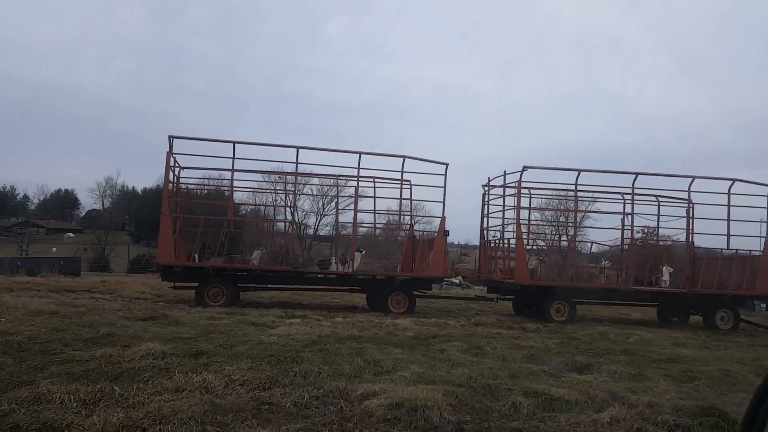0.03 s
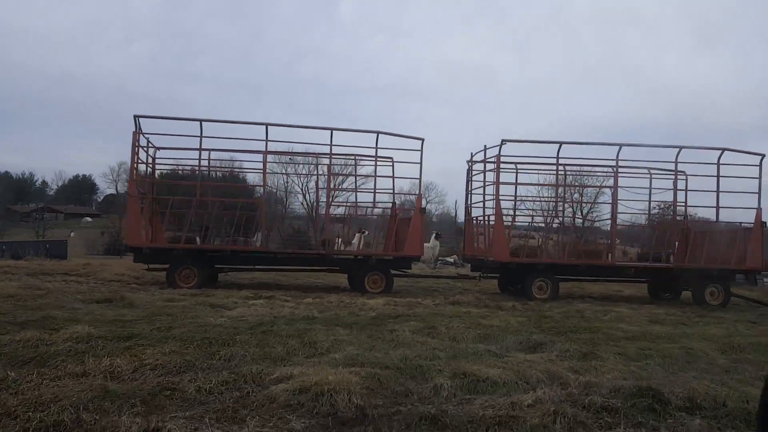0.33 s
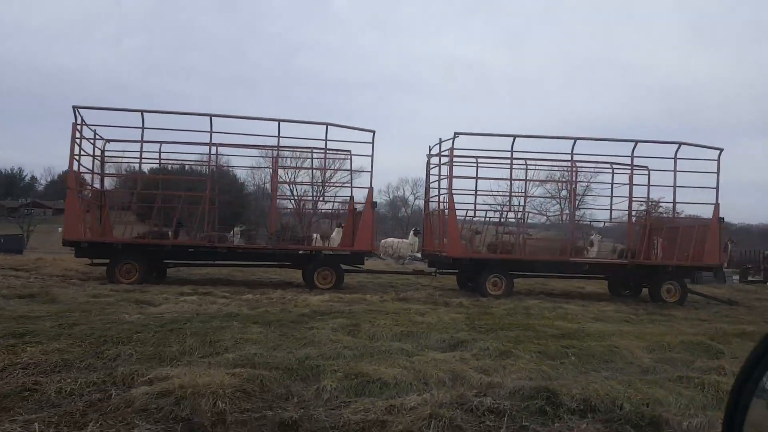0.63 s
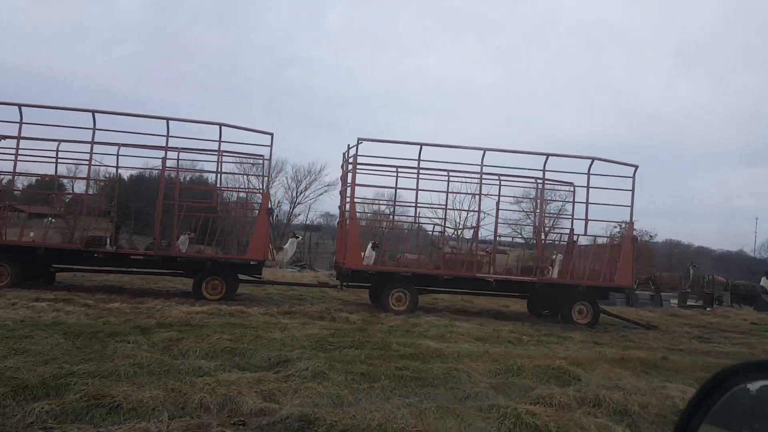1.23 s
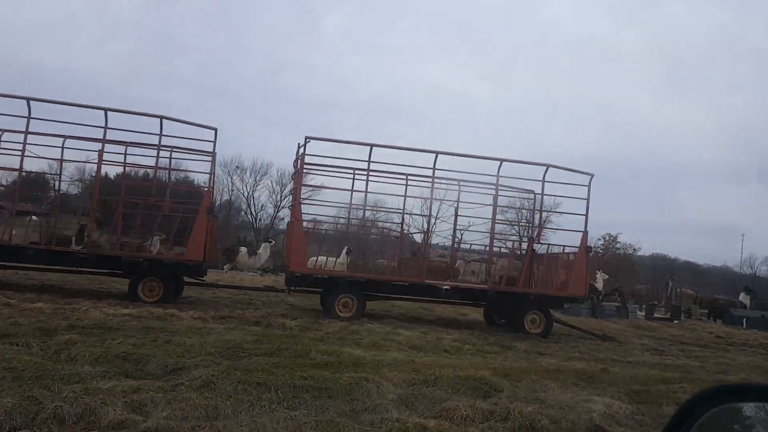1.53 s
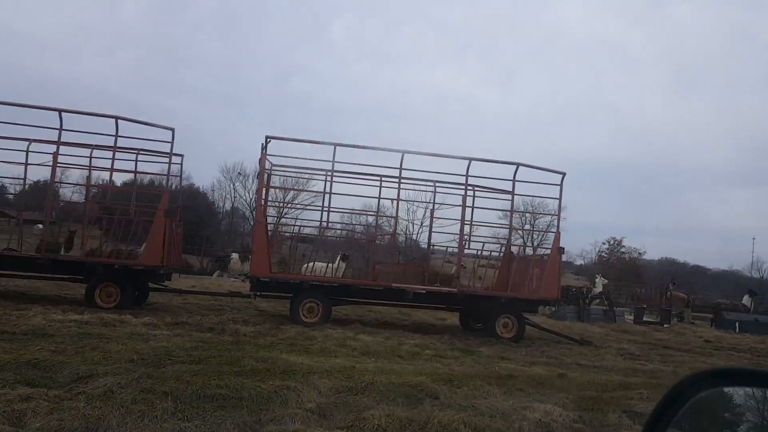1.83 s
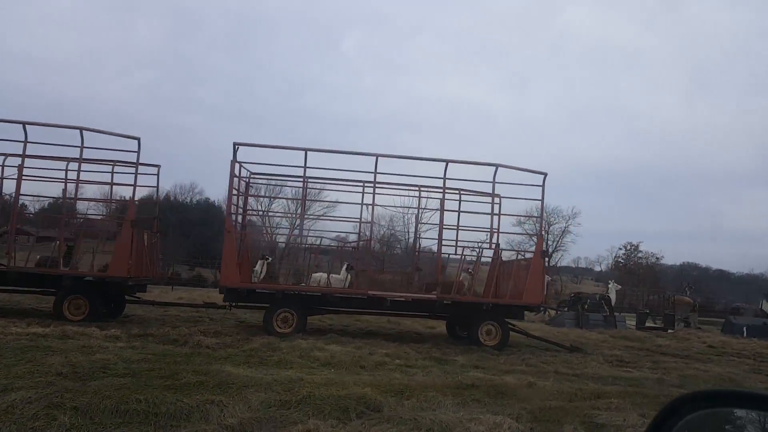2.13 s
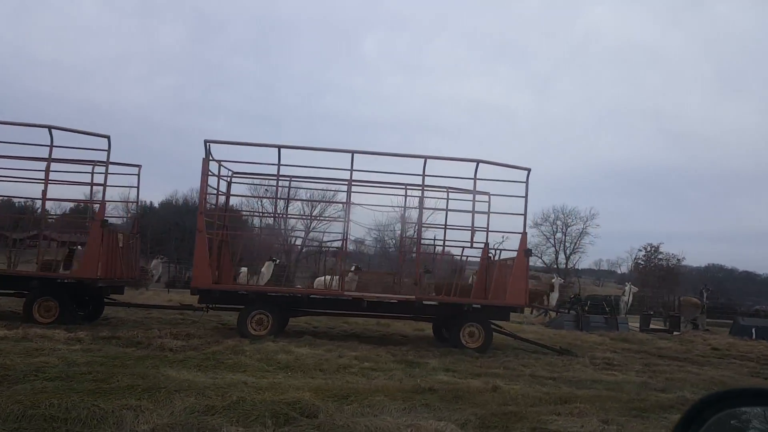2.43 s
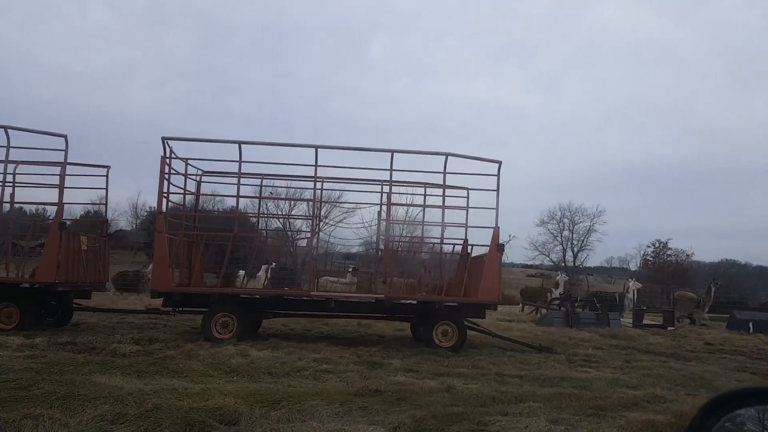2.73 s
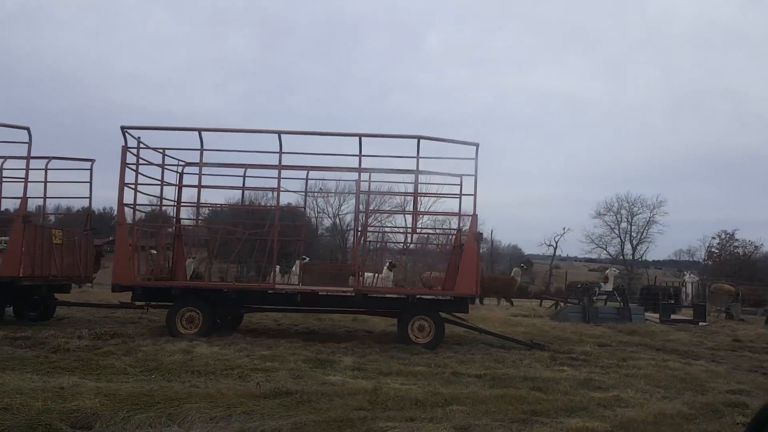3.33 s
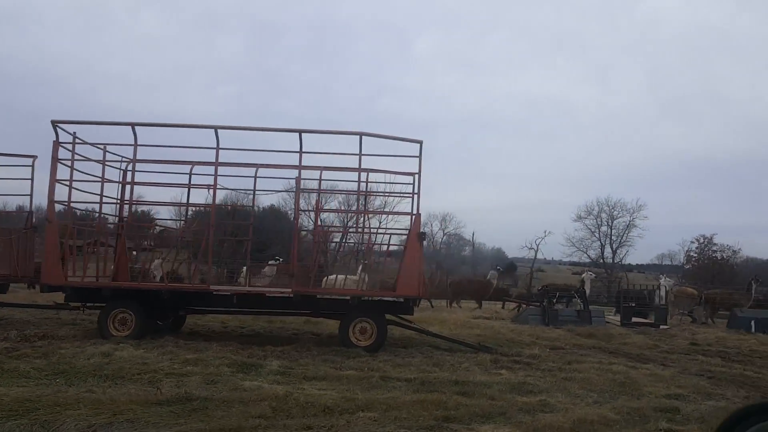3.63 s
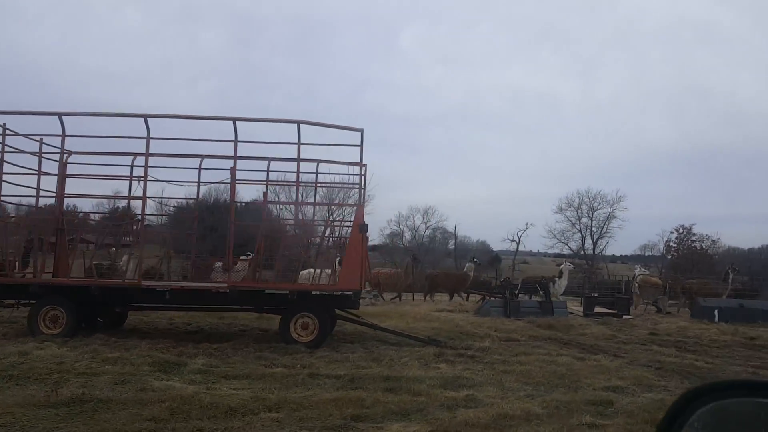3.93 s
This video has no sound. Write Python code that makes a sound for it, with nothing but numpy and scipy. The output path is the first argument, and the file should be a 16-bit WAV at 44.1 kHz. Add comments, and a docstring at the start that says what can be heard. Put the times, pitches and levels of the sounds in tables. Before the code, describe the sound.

Low rumble inside a slowly moving vehicle, with wind, rut thuds and small rattles.

```python
"""Slow drive over a farm field

Inside a vehicle on bumpy ground, on a hand-held recorder by an open window.
Ruts and wind shake the cab, the engine whines, and outside the tyres crunch through grass.
Around the microphone a body panel clunks and loose trim rattles.
Right at its left port something brushes, taps and squeaks against the recorder."""
import sys
import numpy as np
from scipy import signal
from scipy.fft import rfft, irfft
from scipy.io import wavfile
from scipy.ndimage import uniform_filter1d

SR = 44100
rng = np.random.default_rng(int(sys.argv[2]) if len(sys.argv) > 2 else 0)


def wrap_up_sound(samples):
    """Save the sound to the file named by the first command line argument, as 16-bit audio."""
    columns = np.atleast_2d(samples).T
    # keep every value between -1 and 1, then stretch to whole-number steps
    tamed = np.clip(columns, -1, 1)
    steps = np.round(tamed * 32767).astype(np.int16)
    wavfile.write(sys.argv[1], SR, steps)


N = 176400


def undb(db):
    """Decibels to gain."""
    return 10 ** (np.asarray(db) / 20)


def unit(x):
    """Scale to rms 1."""
    return x / np.sqrt(np.mean(x ** 2) + 1e-24)


def curve(rows, column=1):
    """One column of a table, joined by straight lines in time."""
    rows = np.array(rows)
    return np.interp(np.arange(N) / SR, rows[:, 0], rows[:, column])


def colour(x, points, tilt_db=0):
    """Minimum-phase filter through (f/Hz, level/dB) points, tilted per octave above 512 Hz."""
    n, points = 2 * x.shape[-1], np.array(points)
    octave = np.log2(np.maximum(np.arange(n // 2 + 1) * SR / n, 1))
    db = np.interp(octave, np.log2(points[:, 0]), points[:, 1]) + tilt_db * np.maximum(octave - 10, -1)
    cepstrum = irfft(np.log(undb(db)))
    cepstrum[1:n // 2] *= 2
    cepstrum[n // 2 + 1:] = 0
    return irfft(rfft(x, n) * np.exp(rfft(cepstrum)))[..., :n // 2]


def crisp(x, db):
    """Shelf on the highest treble."""
    return colour(x, [(8600, 0), (10500, db)])


def walk(per_s):
    """Smooth random drift of rms 1."""
    hold = max(int(SR / per_s), 2)
    steps = rng.standard_normal(N)[np.arange(N) // hold]
    return unit(uniform_filter1d(uniform_filter1d(steps, hold), hold))


def grainy(per_s, share):
    """Smooth noise with a share of its power in random impulses."""
    grains = (rng.random(N) < per_s / SR) * rng.standard_normal(N)
    return np.sqrt(1 - share) * rng.standard_normal(N) + np.sqrt(share) * unit(grains)


def phase(hz):
    """Running phase of a changing frequency."""
    return 2 * np.pi * np.cumsum(hz) / SR


def pan(db):
    """Channel gains that put the left db above the right."""
    return undb(np.array([[db], [-db]]) / 2)


def spread(noises, spectrum, side_db):
    """Colour two noises and mix them to stereo as mid and side."""
    mid, side = (unit(colour(noise, spectrum)) for noise in noises)
    return mid + undb(side_db) * side * np.array([[1], [-1]])


def add(out, start_s, x):
    """Mix a short sound in at its time."""
    i = max(int(start_s * SR), 0)
    out[:, i:i + x.shape[-1]] += x[..., :max(N - i, 0)]


def tyres():
    """Dry grass crunches under the wheels, outside the open window."""
    # crunch over time: t/s, relative level/dB
    grass = [(0,-57),(.4,-58.5),(.6,-59),(.95,-58),(1.06,-50.5),(1.14,-56.5),(1.21,-54.5),(1.4,-58),(1.7,-59.5),(1.88,-52.5),(2.1,-58.5),(2.35,-60),(3.45,-61.5),(3.6,-59.5),(4,-60.5)]
    # its spectrum: f/Hz, level/dB
    spectrum = [(150,4.5),(450,7),(750,6),(1100,-0.5),(1500,-2.5),(2200,-5),(3200,-9.5),(5000,-12.5),(8500,-14.5),(9800,-24),(15500,-22)]
    crunch = np.array([unit(colour(grainy(per_s=420, share=0.23), spectrum)) for _ in range(2)])
    return crunch * undb(curve(grass) + 4 + 2.44 * walk(45.25)) * pan(4)


def engine():
    """Heard from the cab, slightly rough tones follow the engine speed; the drivetrain hum sinks."""
    # engine speed as the pitch of its whine: t/s, f/Hz
    speed = [(0,443.2),(.42,447.3),(.6,441.5),(.85,444.8),(1.15,437.1),(1.49,446),(1.8,438),(2.05,448.2),(2.27,435.3),(2.95,447),(3.3,441),(4,446)]
    # engine tones: multiple of that pitch, level/dB
    orders = [(0.1872,-46),(.75,-61),(1,-53.5),(1.25,-68)]
    # drivetrain hum: t/s, f/Hz, level/dB
    drivetrain = [(1.1,330,-87),(1.5,317.9,-58.5),(2,311.1,-68),(2.8,280.3,-49.5),(3.25,261.4,-55.5),(3.55,245.2,-47),(4,233,-47.5)]
    turn, whine = phase(curve(speed)), 0
    for multiple, db in orders:
        tone = np.sin(multiple * turn + 0.28 * walk(23.92))
        whine += undb(db) * unit(tone * undb(1.8 * walk(14)))
    hum = np.sin(phase(curve(drivetrain)) + 1.44 * walk(25)) * undb(3.8 * walk(28))
    return whine * pan(0.98) + unit(hum) * undb(curve(drivetrain, column=2))


def cab():
    """All round the microphone, jolts and wind rumble and the cab's air booms over the engine's noise."""
    # shaking of the cab: t/s, relative level/dB
    shaking = [(0,-32),(.17,-35),(.42,-30.5),(.54,-33),(.97,-32),(1.07,-43),(1.14,-33.5),(1.26,-35.5),(1.35,-33.5),(1.52,-34),(1.61,-40),(1.73,-40.5),(1.92,-30),(2.05,-34),(2.37,-34),(2.63,-38),(2.98,-36),(3.26,-39.5),(3.38,-34),(3.52,-40),(3.65,-35),(4,-37)]
    # rumble of ground and wind: f/Hz, level/dB
    rumble_spectrum = [(20,-25.5),(30,4.5),(42,-7.5),(60,3),(82,-1.5),(110,-1.5),(155,-2),(195,-11),(255,-10.5),(320,-24),(500,-37.5),(800,-46.5),(2000,-79)]
    # noise of the running engine: f/Hz, level/dB
    engine_spectrum = [(25,-15),(80,-5),(160,2.5),(260,2),(370,-5),(500,-4),(650,-13),(900,-19.5),(1400,-35.5),(4000,-50.5)]
    shake_db = curve(shaking)
    swell_db = shake_db - shake_db.mean()
    jolts = [grainy(per_s=110, share=0.29) for _ in range(2)]
    rumble = spread(jolts, rumble_spectrum, side_db=-22) * undb(shake_db - 0.36)
    boom = np.sin(phase(hz=32.8 + 2.23 * walk(6.5))) * undb(2.7 * walk(6.3) + swell_db)
    running = spread(rng.standard_normal((2, N)), engine_spectrum, side_db=-5)
    return rumble + undb(-41) * unit(boom) + running * undb(-48 + 0.7 * swell_db) * pan(2.3)


def ruts():
    """Each rut shudders up through the bodywork: a quick swell and a slower fade."""
    # wheels dropping into ruts: t/s, length/s, level/dB
    drops = [(0.59,0.077,-29.5),(1.863,0.22,-37.5),(2.004,0.15,-34.5),(2.16,0.29,-42.5),(3.587,0.09,-33),(3.724,.11,-41)]
    # thud of the bodywork: f/Hz, level/dB
    thud = [(50,-23.5),(100,1),(140,6.5),(175,3),(215,-9.5),(270,-9.5),(380,-13.5),(560,-20),(900,-30),(1600,-48),(4000,-63)]
    force = np.zeros((1, N))
    for start, length, db in drops:
        add(force, start, undb(db) * np.sin(np.pi * np.linspace(0, 1, int(length * SR)) ** 0.56))
    shudder = [grainy(per_s=200, share=0.29) for _ in range(2)]
    return force * spread(shudder, thud, side_db=-21)


def clunks(size=4096, panel_hz=760, decay_s=0.011):
    """A jolted body panel bumps dully in its frame, a little to the left, and dies at once."""
    # bumps: t/s, level/dB
    bumps = [(.605,-49.5),(1.906,-50),(2.189,-46.5),(3.569,-43.5),(3.607,-42),(3.637,-55),(3.672,-48.5),(3.785,-46.5)]
    out, t = np.zeros((2, N)), np.arange(size) / SR
    for start, db in bumps:
        panel = signal.lfilter(*signal.iirpeak(panel_hz, Q=6.2, fs=SR), rng.standard_normal((2, size)))
        add(out, start, unit(panel) * np.exp(-t / decay_s) * undb(db) * pan(4))
    return out


def knocks(size=4096, attack_s=0.00017):
    """In the cab a loose piece chatters for milliseconds in its own resonance; the trim rings briefly."""
    # knocks of loose trim: t/s, relative level/dB, resonance f/Hz, decay/s, top treble/dB
    hits = [(0.6687,-36.5,4200,0.0017,-16),(0.933,-52.5,2200,0.0039,-7),(1.42,-56.5,1210,0.0078,-4),(1.8385,-47.5,1980,0.0042,7),(1.8639,-44.5,1400,0.0025,-1),(1.958,-52.5,5530,0.007,7),(3.1982,-57,8500,0.0044,14),(3.237,-48.5,7100,0.0029,2),(3.382,-53,1840,0.0037,2),(3.4987,-57,6440,0.0062,1),(3.7492,-54,5730,0.0027,1),(3.762,-52.5,2860,0.0064,-2),(3.778,-55,8800,0.004,10)]
    # spectrum of the contact: f/Hz, level/dB
    crack = [(300,-20),(1000,6.5),(2500,-0.5),(4500,-8),(6200,-5.5),(8600,0),(10000,-14),(16000,-9)]
    # modes of the trim: f/Hz, relative level/dB, t60/s
    modes = [(1060,15,.033),(1230,3.5,0.043),(2371,6,0.045),(2810,-3,0.084),(4100,5,.03)]
    out, t = np.zeros((2, N)), np.arange(size) / SR
    attack = 1 - np.exp(-t / attack_s)
    for start, db, piece_hz, decay_s, top_db in hits:
        tilt_db = 0.1 * np.log2(piece_hz / 1500)  # small, high pieces are brighter
        chatter = crisp(colour(rng.standard_normal((2, size)), crack, tilt_db), top_db)
        chatter += undb(13) * signal.lfilter(*signal.iirpeak(piece_hz, Q=5.7, fs=SR), chatter)
        ring = 0
        for hz, mode_db, t60 in modes:
            fade = undb(mode_db - 60 * t / t60 + 2 * tilt_db * np.log2(hz / 6000))
            detuned_hz = hz * (1 + 0.0074 * rng.standard_normal())
            ring += fade * np.sin(2 * np.pi * (detuned_hz * t + rng.random((2, 1))))
        knock = unit(chatter) * np.exp(-t / decay_s) + undb(-21) * ring
        add(out, start, 2 * knock * attack * undb(db + 2.5) * pan(4))
    return out


def squeaks(pitch_hz=10060, waver=0.0035):
    """Friction against the recorder gives brief, thin tones."""
    # squeaks: t/s, length/s, level/dB
    slips = [(.012,.03,-75),(.052,.05,-72),(.275,.042,-75),(.995,.06,-76)]
    envelope = np.zeros((2, N))
    tone = unit(np.sin(phase(pitch_hz * (1 + waver * walk(85)))))
    for start, length, db in slips:
        add(envelope, start, undb(db) * np.sqrt(np.hanning(int(length * SR))))
    return envelope * tone * pan(3)


def brushing():
    """Strokes of fine friction swell and fade close to the left port, each with its own hiss."""
    # strokes: middle t/s, length/s, relative level/dB, emphasis/dB
    strokes = [(.31,0.16,-54.5,5.5),(0.523,0.41,-57.5,9),(.974,0.34,-56.5,10),(1.073,0.15,-52,7),(1.215,.12,-53,8),(1.287,0.29,-55.5,4),(1.613,0.39,-54,0),(2.298,0.24,-57.5,-3),(2.82,0.3,-59,-3.5),(3.237,0.39,-59.5,0),(3.604,0.54,-60,1.5)]
    # spectrum of the friction: f/Hz, level/dB, weight of the emphasis
    friction = [(300,2,0.4),(895,0,1),(2280,4.5,0.83),(3340,1,-0.6),(4620,3,-0.42),(5670,3.5,0.46),(7540,0.5,0.87),(8680,5.5,-0.27),(9300,-8.5,-0.56),(15600,-7,-0.35)]
    out = np.zeros((2, N))
    hz, base_db, weight = np.array(friction).T
    grain = np.array([grainy(per_s=2500, share=0.25) for _ in range(2)])
    for middle, length, db, emphasis_db in strokes:
        n, i = int(length * SR), max(int((middle - length / 2) * SR), 0)
        hiss = colour(grain[:, i:i + n], np.c_[hz, base_db + emphasis_db * weight])
        swell = np.sin(np.linspace(0, np.pi, hiss.shape[-1]))
        add(out, i / SR, unit(hiss) * undb(db) * swell)
    return out * undb(0.5 + 0.64 * walk(39.8)) * undb([[0], [-10]])


def taps(size=2048, lead_s=0.001, tail_s=0.0016):
    """A light touch, then a dry snap through the recorder's case, hard left at the microphone."""
    # taps: t/s, relative level/dB, bass cut f/Hz
    hits = [(1.3447,2,120),(1.62,-20,2500),(1.703,-13.5,2500),(3.1246,-13,5070),(3.3077,-22,6015),(3.371,-21,1504),(3.4573,-19,500),(3.8112,-9,2602),(3.8264,-8.5,450)]
    # response of the case: f/Hz, level/dB
    case = [(100,-1),(700,0.5),(2400,1.5),(3300,-5.5),(4400,-11.5),(5600,-7),(8000,-2.5),(9500,-14),(11500,-19.5),(13500,-21),(16000,-25)]
    out, t = np.zeros((2, N)), np.arange(size) / SR
    for start, db, cut_hz in hits:
        push = undb(-28) * rng.standard_normal(size) * np.exp(-t / tail_s)
        push[0] = 1
        push = np.roll(push, int(lead_s * SR))
        push[0] = undb(-13.5)  # the touch ahead of the snap
        snap = signal.lfilter(*signal.butter(1, cut_hz, "high", fs=SR), colour(push, case))
        snap = crisp(snap, -0.34 * db)  # lighter taps are crisper
        add(out, start - lead_s, snap * undb(db + 1.5) * undb([[0], [-32]]))
    return out


def scene():
    """The moving vehicle and the small, close sounds, from the seat by the window."""
    return cab() + ruts() + engine() + tyres() + brushing() + taps() + knocks() + clunks() + squeaks()


def record(dry, low_hz=20, top_hz=15950):
    """The hand-held recorder cuts the deepest bass and the top."""
    dry = signal.sosfilt(signal.butter(4, low_hz, "high", fs=SR, output="sos"), dry)
    return signal.sosfilt(signal.ellip(8, .2, 70, top_hz, fs=SR, output="sos"), dry)


dry = scene()
out = record(dry)
wrap_up_sound(out)
```